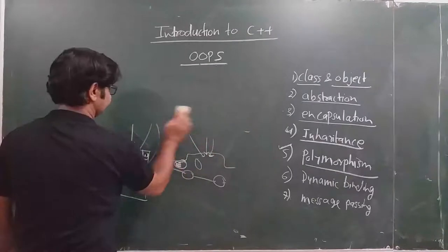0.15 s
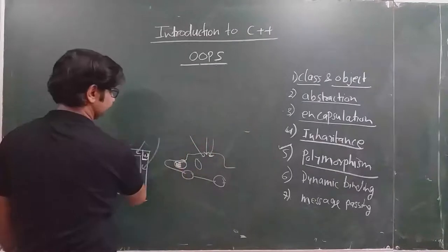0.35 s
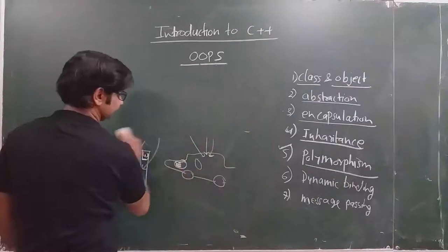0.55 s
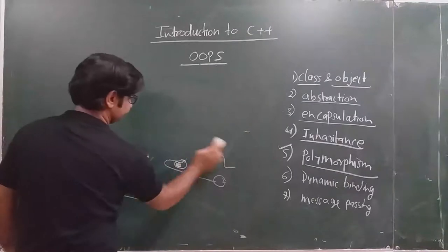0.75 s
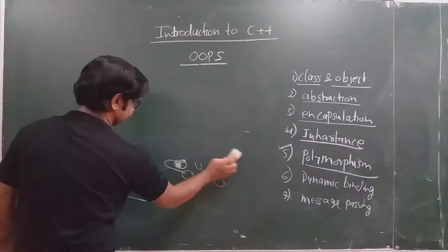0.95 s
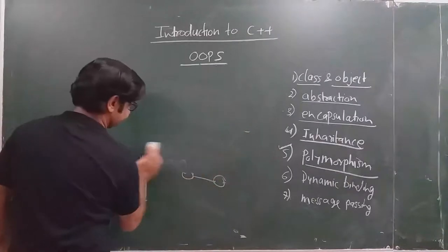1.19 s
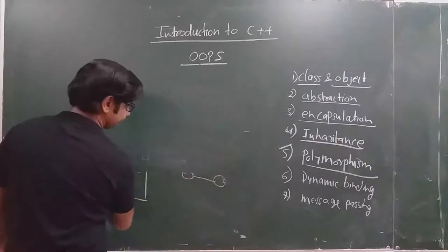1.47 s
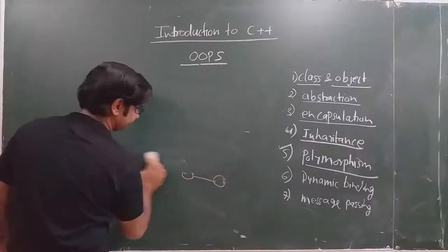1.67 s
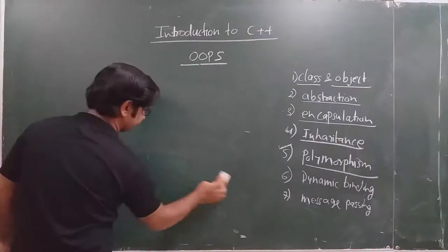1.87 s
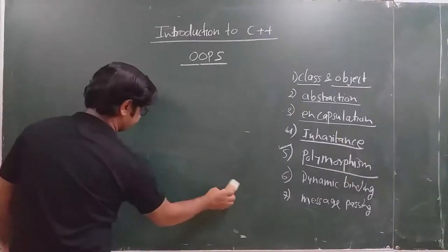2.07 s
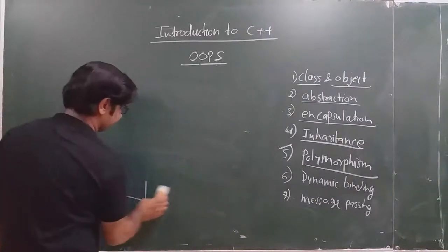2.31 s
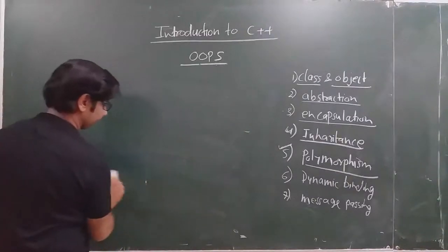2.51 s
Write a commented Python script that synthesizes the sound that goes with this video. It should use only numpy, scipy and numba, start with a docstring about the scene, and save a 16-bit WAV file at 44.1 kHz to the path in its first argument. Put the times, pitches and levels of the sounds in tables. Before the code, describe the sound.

A dry felt eraser rubs a chalkboard in five strokes, beginning at about 0, 0.46, 0.93, 1.45 and 2.03 seconds and ending near 2.65. Each swells into a grainy scrape with bright dusty hiss, then nearly vanishes at the turn. The rasp's tone glides alternately down and up, starting downward. Low board rumble and a constant wavering fan hum sit underneath, with a short classroom tail, centred mono.

```python
"""A fan hums in a classroom, and at once a dry felt eraser starts across the chalkboard: five sweeps, left and right.
The felt catches in countless tiny slips: the board rumbles, the pad scrapes and the chalk dust hisses,
all rising with the speed of the hand. A rasping resonance glides up or down along each sweep,
with a bright sizzle drifting above it. One near reflection and a short room tail follow the eraser."""
import sys
import numpy as np
from scipy import signal
from scipy.fft import rfft, irfft, next_fast_len
from scipy.io import wavfile
from scipy.ndimage import map_coordinates
from numba import njit

SR = 44100
rng = np.random.default_rng(int(sys.argv[2]) if len(sys.argv) > 2 else 0)


def waveform_to_disk(signal):
    """Save audio, clipped to [-1, 1], as 16-bit WAV at the path in sys.argv[1]."""
    frames = np.transpose(np.atleast_2d(signal))
    scaled = np.clip(frames, -1, 1) * 32767
    samples = np.round(scaled).astype(np.int16)
    wavfile.write(sys.argv[1], SR, samples)


N = 116865  # length in samples

# growth with hand speed (dB per tenfold speed)
BOARD_SLOPE_DB, RASP_SLOPE_DB, HISS_SLOPE_DB = 0.5, 3, 32.5
BOARD_DB = -41  # rumble of the board at full speed
SCRAPE_DB, RASP_DB = -3, -2.24  # relative to the scrape level of the hand
HISS_DB, SIZZLE_DB = -1, -3.5  # relative to the hiss level of the hand
RASP_WIDTH_HZ, SIZZLE_WIDTH_HZ = 1930, 3100
# antiresonance of the pad: multiple of its resonance, width, share removed
HOLLOW_RATIO, HOLLOW_WIDTH_HZ, HOLLOW_DEPTH = 1.495, 800, 0.3
SLIPS_PER_S = 12000  # at full speed
AIR_DB = -38.5
WHINE_ABOVE_HZ = 350  # fan lines above this share one slow level curve
MIRROR_S, MIRROR_WANDER_S, MIRROR_DB = .0028, .00005, -14.5  # first reflection
ROOM_T60_S, ROOM_DB, ROOM_TREBLE_DB = 0.21, -16.5, -7
TOP_HZ = 15700


def undb(db):
    """Decibels to gain."""
    return 10 ** (np.asarray(db) / 20)


def unit(x):
    """Scale to an rms of 1."""
    return x / np.sqrt(np.mean(x ** 2))


def colour(x, points):
    """Filter by (Hz, dB) points joined on a log-frequency axis."""
    hz, db = np.array(points, float).T
    size = next_fast_len(N + 4096)
    f = np.maximum(np.arange(size // 2 + 1) * SR / size, 1)
    gain = undb(np.interp(np.log(f), np.log(hz), db))
    return irfft(rfft(x, size) * gain, size)[:N]


@njit
def resonate(x, hz, width):
    """Band-pass with a moving centre: a state-variable filter, peak gain 1, width in Hz."""
    y, band, low = np.empty(len(x)), 0., 0.
    for i in range(len(x)):
        g, k = np.tan(np.pi * hz[i] / SR), width / hz[i]
        v = (band + g * (x[i] - low)) / (1 + g * (g + k))
        band, low, y[i] = 2 * v - band, low + 2 * g * v, k * v
    return y


def steep(x, hz, width):
    """A resonance applied twice, at unit level."""
    hz = np.clip(hz, 100, .44 * SR)
    once = resonate(x, hz, float(width))
    return unit(resonate(once, hz, float(width)))


def walk(rate):
    """Smooth chance with a spread of 1, changing about rate times a second."""
    steps = rng.standard_normal(4096)
    return unit(map_coordinates(steps, [np.arange(N) / SR * rate], order=2, mode="mirror"))


def fan():
    """Wavering motor lines over a low rush of air; the upper lines sink a little past halfway."""
    # Hum lines of the motor. Each row: frequency in Hz, rms level in dB (the whine curve adds to the
    # upper lines), unsteadiness 0-1, wavers per second.
    fan_lines = [(48.4, -45.5, 0.2, 6), (96.8, -46.5, .9, 18), (146.4, -48.5, .8, 22),
                 (188.6, -47, 0.38, 11), (196.5, -40.5, 0.37, 20), (292.2, -47, 0.65, 16),
                 (394.2, -53.5, 0.71, 9.77), (439.5, -50, 0.49, 8.14), (489.5, -49, 0.12, 5.97),
                 (557.3, -50.5, .3, 6.44), (577.7, -56.5, 0.44, 6.4), (1076, -60.5, 0.17, 4.63),
                 (1395, -64, 0, 4.5)]
    # Spectrum of the moved air. Each row: frequency in Hz, relative density in dB per Hz.
    air_colour = [(20, -31), (35, -28), (60, -10), (85, -1), (110, 2), (190, 4.5), (260, 2), (360, -6.5),
                  (550, -7.5), (800, -8.5), (1300, -11.5), (2000, -23), (4000, -24.5), (7000, -36),
                  (12000, -82), (16000, -68)]
    # Level curve of the upper hum lines. Each row: time in seconds, added level in dB.
    whine_curve = [(0, -1.5), (.25, 2.5), (.9, -1), (1.45, 3), (1.65, -6.5), (2.65, -2)]
    t = np.arange(N) / SR
    out = undb(AIR_DB) * unit(colour(rng.standard_normal(N), air_colour))
    whine_db = np.interp(t, *np.array(whine_curve).T)
    for hz, db, unsteady, rate in fan_lines:
        # a steady part plus a part wandering in both level and phase
        wander = (walk(rate) + 1j * walk(rate)) / np.sqrt(2)
        sway = 1 - unsteady + unsteady * wander
        line = unit(np.real(sway * np.exp(2j * np.pi * (hz * t + rng.random()))))
        out = out + undb(db + whine_db * (hz > WHINE_ABOVE_HZ)) * line
    return out


def classroom(x):
    """A nearby surface mirrors the eraser over a path that wanders; bare walls add a short, duller tail."""
    lag_s = MIRROR_S + MIRROR_WANDER_S * walk(2.95)
    mirrored = map_coordinates(x, [np.arange(N) - lag_s * SR], order=3, mode="mirror")
    x = x + undb(MIRROR_DB) * mirrored
    t = np.arange(SR // 2) / SR
    decay = np.exp(-np.log(1000) * t / ROOM_T60_S)  # 60 dB down after ROOM_T60_S
    tail = rng.standard_normal(len(t)) * decay * (t > .006)  # the tail starts after 6 ms
    wet = signal.fftconvolve(x, tail / np.sqrt(np.sum(tail ** 2)))[:N]
    return x + undb(ROOM_DB) * colour(wet, [(3000, 0), (10000, ROOM_TREBLE_DB)])


def hand():
    """Speed, loudness and tuning of the pad, sample by sample; speed is inferred from the hiss level."""
    # Effort of the hand, sinking at each turn. Each row: time in seconds, level of the hiss in dB,
    # level of the scrape in dB, both before the trims of each layer.
    effort = [(0.0, -65.5, -60), (0.051, -56.5, -45.5), (0.124, -45.5, -39), (0.221, -43, -41),
              (0.317, -47, -36.5), (0.396, -52.5, -40.5), (0.462, -68, -56), (0.514, -53.0, -45),
              (0.588, -45.5, -36), (0.688, -44.0, -39), (0.788, -47, -39), (0.868, -58.5, -45.0),
              (0.937, -67.5, -66), (0.992, -54.5, -46.5), (1.078, -44.5, -40.5), (1.187, -47.5, -40.5),
              (1.297, -48, -39.5), (1.386, -54.5, -41), (1.459, -67.5, -70), (1.523, -53.5, -45.5),
              (1.615, -48.5, -39.5), (1.735, -46, -38.5), (1.854, -47, -39.5), (1.952, -58, -45),
              (2.033, -67.5, -78), (2.101, -54.5, -48.5), (2.2, -48.5, -42.5), (2.329, -46.0, -42),
              (2.459, -49.5, -40.5), (2.564, -51.5, -45.0), (2.65, -63.0, -60)]
    # The sweeps. Each row: start in seconds, pad resonance in Hz at the start, midway and at the end,
    # rasp in dB, sizzle in Hz at the start and at the end, sizzle in dB (both dB relative).
    sweeps = [(0, 5530, 4680, 2060, -5.5, 8700, 13000, -7), (.46, 2520, 4050, 5450, -1, 9600, 10000, -3.5),
              (.93, 5400, 4080, 2670, -2, 9100, 10000, -4.5),
              (1.455, 2500, 3880, 5200, -3.5, 10900, 9200, -4),
              (2.03, 5500, 3610, 2200, 0, 10300, 12200, -4)]
    t = np.arange(N) / SR
    times, hiss_points, scrape_points = np.array(effort).T
    # joined as gains, then back to dB
    hiss_db = 20 * np.log10(np.interp(t, times, undb(hiss_points)))
    scrape_db = 20 * np.log10(np.interp(t, times, undb(scrape_points)))
    speed = 10 ** ((hiss_db - hiss_db.max()) / HISS_SLOPE_DB)  # 1 at the fastest

    rows = np.array(sweeps, float)
    place = np.interp(t, np.append(rows[:, 0], N / SR), np.arange(len(rows) + 1))
    sweep = np.minimum(place.astype(int), len(rows) - 1)
    along = place - sweep  # 0 to 1 within each sweep
    _, first, midway, last, rasp_db, sizzle_from, sizzle_to, sizzle_db = rows[sweep].T
    offset_hz = np.where(along < .5, first - midway, last - midway)
    pad_hz = midway + offset_hz * np.abs(2 * along - 1)
    sizzle_hz = sizzle_from + (sizzle_to - sizzle_from) * along
    return speed, scrape_db, hiss_db, pad_hz, rasp_db, sizzle_hz, sizzle_db


def slips(speed, spread_db=2.0, smooth=0.92):
    """Tiny random slips of the felt, denser at speed, over a smooth rub; even in level overall."""
    chance = np.clip(SLIPS_PER_S * speed / SR, 1e-4, 1)  # per sample
    size = undb(spread_db * np.minimum(rng.exponential(size=N), 5))
    clicks = (rng.random(N) < chance) * rng.choice([-1, 1], N) * size
    even = unit(clicks / np.sqrt(chance))  # same power at every density
    return unit(even + smooth * rng.standard_normal(N))


def board_rumble(speed):
    """The slips shake the board, which answers in its low range and barely louder with speed."""
    # Spectrum of the shaken board. Each row: frequency in Hz, relative density in dB per Hz.
    board_colour = [(70, -31), (130, 4), (240, 1.5), (400, -3.5), (700, -3), (1000, -10), (1400, -11.5),
                    (2000, -15), (4000, -35)]
    level_db = BOARD_DB + BOARD_SLOPE_DB * np.log10(speed)
    return unit(colour(slips(speed), board_colour)) * undb(level_db)


def pad_scrape(speed):
    """The slips scrape through the body of the felt pad."""
    # Spectrum of the scraping pad. Each row: frequency in Hz, relative density in dB per Hz.
    scrape_colour = [(500, -11), (1100, -4), (1600, -1.5), (2200, 2), (3000, 0.5), (4200, -1), (5400, -6),
                     (6400, -10), (7500, -8.5), (10000, -21), (15500, -36)]
    return undb(SCRAPE_DB) * unit(colour(slips(speed), scrape_colour))


def pad_rasp(speed, pad_hz, rasp_db, wobble=0.019):
    """The slips ring the pad's gliding resonance, which wobbles a little in pitch."""
    level_db = RASP_DB + rasp_db + RASP_SLOPE_DB * np.log10(speed)
    centre_hz = pad_hz * (1 + wobble * walk(16))
    return undb(level_db) * steep(slips(speed), centre_hz, RASP_WIDTH_HZ)


def chalk_dust(speed, sizzle_hz, sizzle_db):
    """The slips hiss in the dust, with a drifting band of sizzle."""
    # Spectrum of the dust hiss. Each row: frequency in Hz, relative density in dB per Hz.
    hiss_colour = [(3000, -34), (6000, 2), (7400, -4.5), (8800, 5.5), (10500, 4), (13000, 1.5), (14500, -1),
                   (16000, -11)]
    hiss = undb(HISS_DB) * unit(colour(slips(speed), hiss_colour))
    sizzle = steep(slips(speed), sizzle_hz, SIZZLE_WIDTH_HZ)
    return hiss + undb(SIZZLE_DB + sizzle_db) * sizzle


def eraser():
    """Board, pad and dust together; a hollow in the pad and dust rides above the gliding resonance."""
    speed, scrape_db, hiss_db, pad_hz, rasp_db, sizzle_hz, sizzle_db = hand()
    felt = pad_scrape(speed) + pad_rasp(speed, pad_hz, rasp_db)
    pad = felt * undb(scrape_db) + chalk_dust(speed, sizzle_hz, sizzle_db) * undb(hiss_db)
    hollow = resonate(pad, HOLLOW_RATIO * pad_hz, float(HOLLOW_WIDTH_HZ))
    return board_rumble(speed) + pad - HOLLOW_DEPTH * hollow


def scene():
    """Eraser and fan, straight ahead: the same in both channels."""
    return np.tile(classroom(eraser()) + fan(), (2, 1))


def record(dry):
    """The microphone signal with its top cut steeply, by 80 dB just above TOP_HZ."""
    top_cut = signal.ellip(14, .1, 80, TOP_HZ, fs=SR, output="sos")
    return signal.sosfilt(top_cut, dry)


dry = scene()
out = record(dry)
waveform_to_disk(out)
```